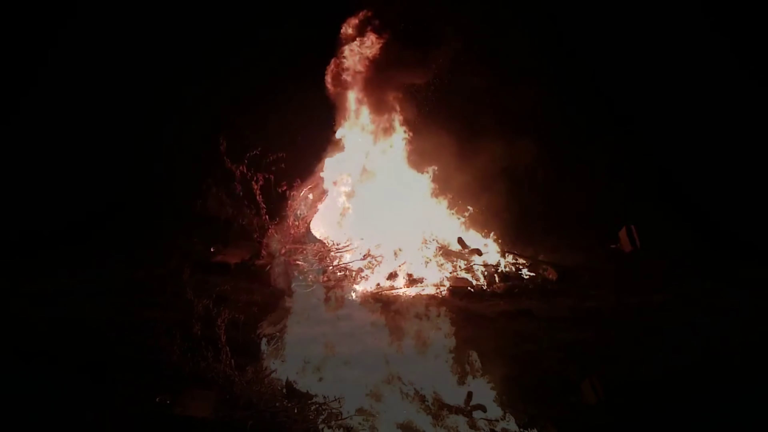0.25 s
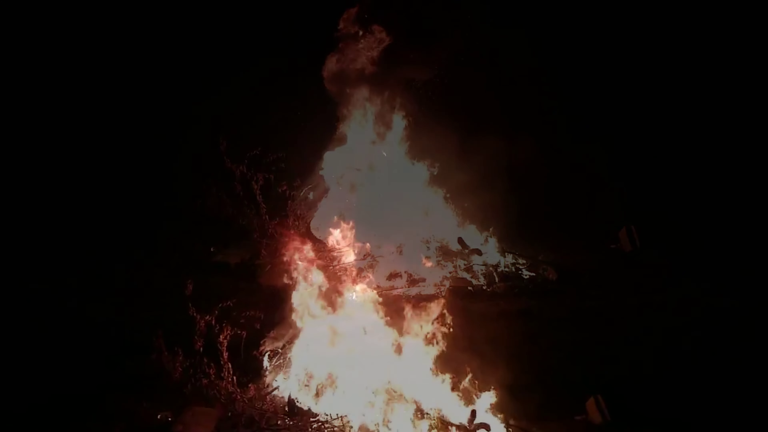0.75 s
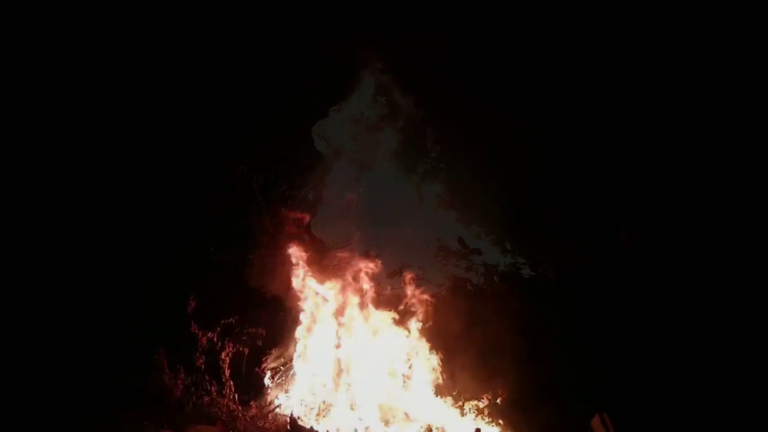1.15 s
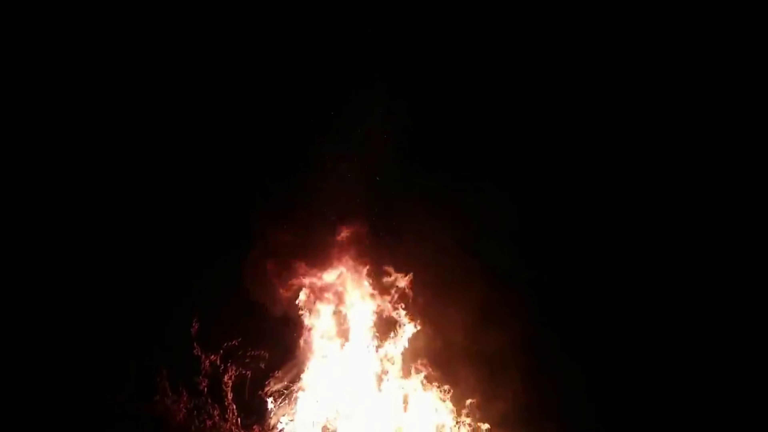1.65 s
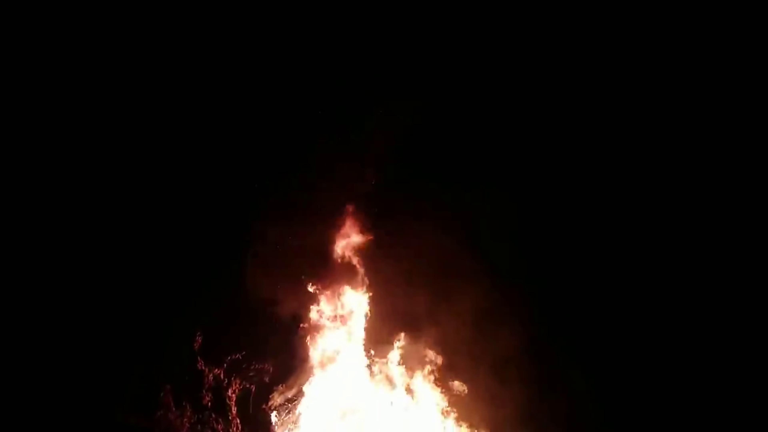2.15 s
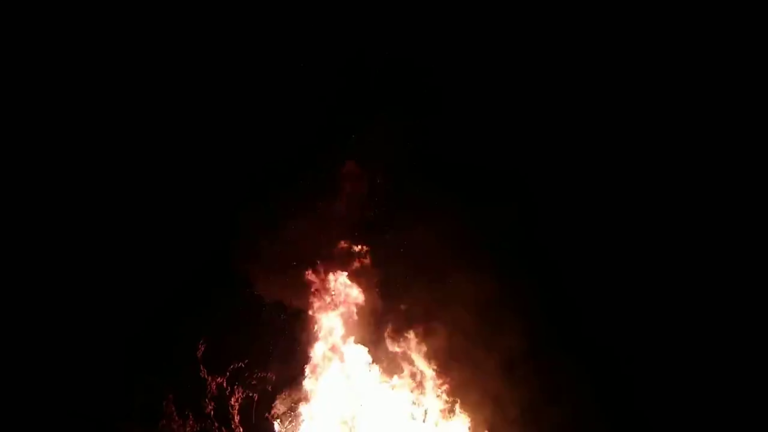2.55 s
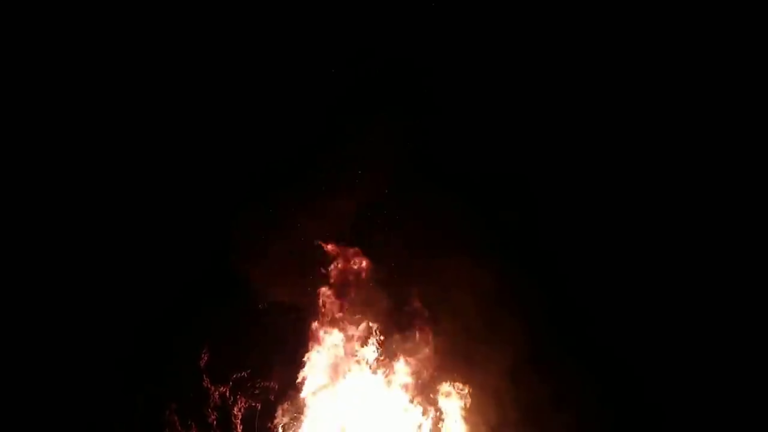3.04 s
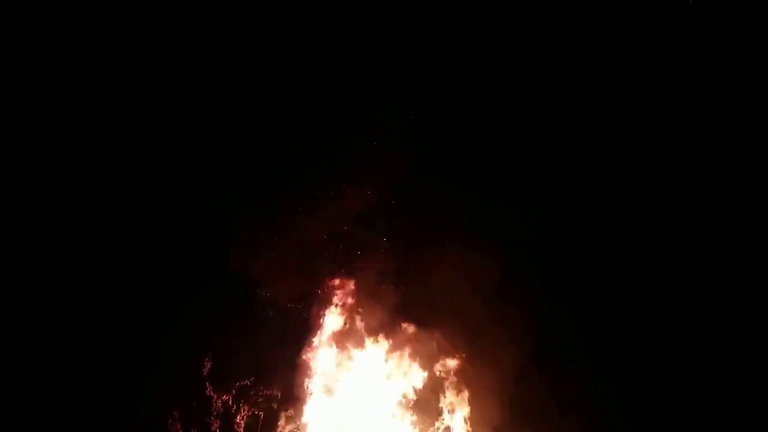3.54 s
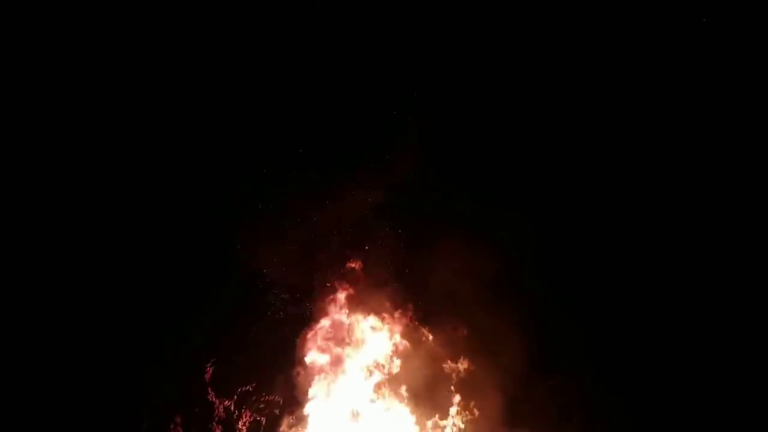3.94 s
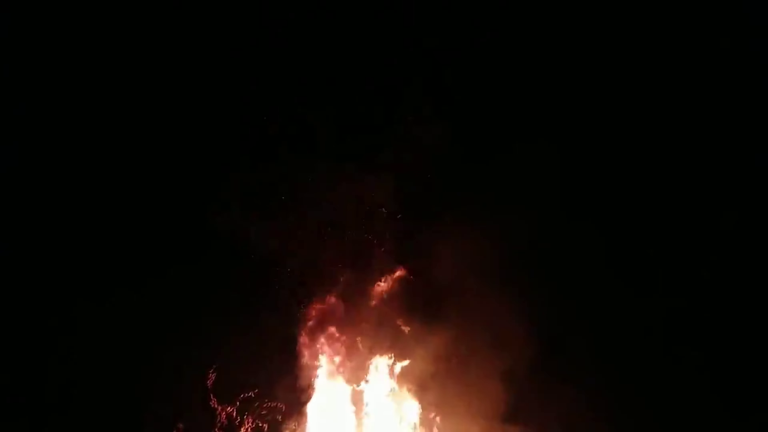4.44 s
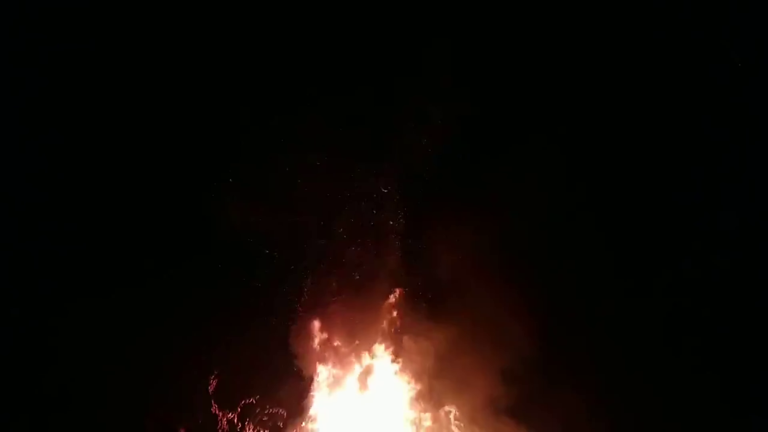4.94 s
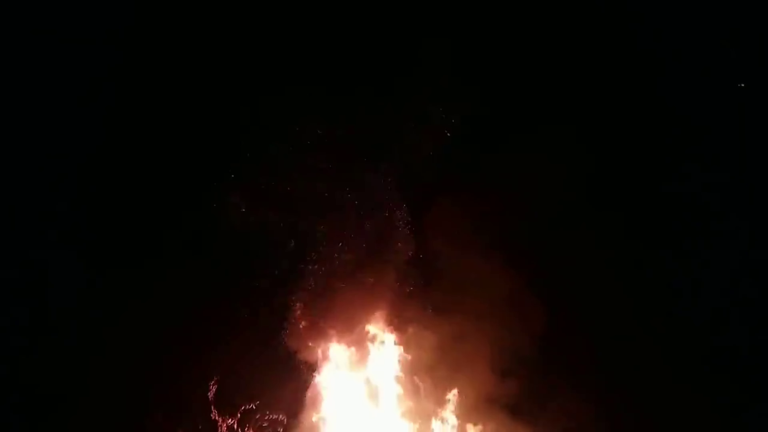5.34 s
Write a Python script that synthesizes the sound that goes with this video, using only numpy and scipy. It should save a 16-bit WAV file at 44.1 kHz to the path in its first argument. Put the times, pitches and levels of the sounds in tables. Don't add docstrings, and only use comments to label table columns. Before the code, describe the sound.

A large bonfire roars low and flutters in slow motion, wet wood hissing while sharp pops stutter in rapid little repeats.

```python
import sys
import numpy as np
from scipy import signal
from scipy.fft import rfft, irfft
from scipy.io import wavfile
from scipy.ndimage import uniform_filter1d

SR = 44100
rng = np.random.default_rng(int(sys.argv[2]) if len(sys.argv) > 2 else 0)


def volts_from_decibels(level):
    exponent = np.asarray(level, float) / 20
    return 10 ** exponent


def inscribe(sig):
    pcm = np.round(np.clip(np.atleast_2d(sig).T, -1, 1) * 32767)
    wavfile.write(sys.argv[1], SR, pcm.astype(np.int16))


N = 246519
FIRE_N = SR * 3 // 2


# start_s, knock_db, snap_db, spit_db
SAP_BURSTS = [(0.0773, -37, -48, -61), (0.1068, -24.5, -38, -40), (0.1283, -58, -39, -34),
              (0.174, -61, -38, -30), (0.1967, -26, -34, -45), (0.2083, -26.5, -27.5, -26),
              (0.321, -56, -39, -57), (0.3642, -42, -38, -49), (0.383, -45, -38.5, -46),
              (0.3941, -42, -42, -33.5), (0.6505, -35, -36, -46), (0.7466, -37, -41, -55),
              (0.768, -32.5, -38.5, -32.5), (0.7963, -37.5, -39, -45), (0.8331, -30.5, -25, -37.5),
              (0.8474, -50, -33, -32), (0.953, -56, -42, -31), (0.9716, -26, -22.5, -32.5),
              (1.027, -36.5, -52, -43), (1.0791, -31, -41, -49), (1.106, -37, -32.5, -25),
              (1.1165, -40, -24.5, -23.5), (1.1455, -12, -28, -36), (1.1594, -30, -45, -39),
              (1.209, -53, -56, -33), (1.219, -37, -40, -19), (1.227, -62, -44, -43),
              (1.253, -46, -52, -47), (1.266, -33, -26, -34), (1.2705, -48, -35, -40)]
# start_s, knock_db, snap_db, spit_db
SMALL_CRACKLES = [(0.0118, -35, -46, -30), (0.0174, -55, -49, -54), (0.041, -48, -62, -57),
                  (0.0645, -32, -53, -52), (0.0898, -35, -34, -49), (0.0994, -36, -47, -48),
                  (0.167, -41, -51, -56), (0.182, -57, -45, -39), (0.2137, -47, -40, -48),
                  (0.2196, -45, -52, -49), (0.236, -59, -55, -45), (0.2567, -64, -52, -43),
                  (0.2877, -58, -62, -41), (0.3108, -57, -47, -48), (0.3152, -45, -46, -49),
                  (0.3252, -39, -40, -48), (0.3614, -44, -54, -41), (0.4155, -41, -53, -55),
                  (0.4573, -52, -44, -38), (0.4707, -34.5, -46, -38), (0.495, -52, -47.5, -60),
                  (0.5316, -65, -53, -46.5), (0.5462, -50, -57.5, -65.5), (0.5835, -42, -51, -38),
                  (0.599, -36, -37.5, -36), (0.6335, -39, -40, -37), (0.739, -62, -51, -38),
                  (0.7754, -44, -53, -52), (0.8013, -52, -42, -46), (0.823, -62, -50, -56),
                  (0.906, -49, -43, -49), (0.9122, -52, -43.5, -48), (0.9284, -35, -57, -31),
                  (0.9418, -56, -49, -44), (0.9645, -43, -48, -32), (1, -44, -41, -35.5),
                  (1.061, -62, -49, -32.5), (1.089, -31.5, -44, -30.5), (1.174, -50, -55, -35),
                  (1.1967, -46, -52, -37), (1.2117, -65, -59, -57), (1.2566, -32, -37, -38),
                  (1.3035, -54, -48, -39), (1.3082, -44, -45, -52), (1.3248, -47, -37, -52),
                  (1.3316, -54, -55, -33), (1.3419, -60, -50, -51), (1.3469, -44, -42, -51),
                  (1.3613, -67.5, -50, -42), (1.3713, -62, -56, -37), (0.6168, -52, -40, -47)]
# freq_hz, gain_db
POP_TONE = [(450, 3), (750, -4), (1400, 9), (2300, 2), (3800, 4), (6500, 0), (8500, 3.5), (11000, 1),
            (15300, 0.5)]
POP_LAG_SAMPLES = 4


def pops():
    lead = SR * 3 // 1000
    t = (np.arange(SR // 50) - lead) / SR
    layers = np.zeros((3, 2, FIRE_N + len(t)))
    tail_gain = np.array([[.12], [.16], [.16]])
    tail = tail_gain * volts_from_decibels(-60 * np.abs(t) / np.where(t > 0, .02, .009))
    bounce_gain = -np.array([.42, .45, .35])[:, None, None]
    crack_gain, bounce_s = 10, 0.00203
    for start_s, *db in SAP_BURSTS + SMALL_CRACKLES + ticks():
        blur = np.clip(volts_from_decibels(-.9 * (max(db) + 27)), 1, 5)
        both, left, right = rng.standard_normal((3, len(t)))
        spray = np.array([both + 6.3 * left, both + 0.74 * right]) / 2.46
        crack = (t == 0) * crack_gain / blur ** 2
        spike = np.exp(-.5 * (t / blur / .00018) ** 2) * spray + crack
        bounce = bounce_gain * np.roll(spike[::-1], round(bounce_s * SR), axis=1)
        size = np.sqrt(np.sum(spike ** 2) / 2 / blur)
        burst = spike / size + bounce / size + 0.5 * tail[:, None] * spray
        at = round(start_s * SR)
        layers[:, :, at:at + len(t)] += volts_from_decibels(db)[:, None, None] * burst
    layers[:, 0] = np.roll(layers[:, 0], POP_LAG_SAMPLES, axis=1)

    hz = np.fft.rfftfreq(FIRE_N, 1 / SR)
    colour = ports(347, 22000, depth=1.0, tone=POP_TONE)
    total = np.linalg.norm(colour(hz))
    spectrum = 0
    for layer, edges_hz, trim_db in zip(layers, [(20, 2430), (4700, 10940), (9200, 41000)], [14.5, 15, 15]):
        split = band(hz, *edges_hz)
        share = volts_from_decibels(trim_db) * split * total / np.linalg.norm(colour(hz) * split)
        spectrum = spectrum + share * rfft(layer[:, lead:FIRE_N + lead])
    return coloured(irfft(spectrum, FIRE_N), colour)


# knock_db, snap_db, spit_db
TICK_DB = [-46, -47.5, -54.5]
TICK_COUNT, TICK_SCATTER_DB = 40, -6.5


def ticks():
    chance = rng.random((TICK_COUNT, 4))
    scatter = np.sqrt(12) * (chance[:, 1:] - .5)
    db = np.array(TICK_DB) + TICK_SCATTER_DB * scatter
    start_s = chance[:, 0] * 1.4
    return np.column_stack([start_s, db]).tolist()


# freq_hz, density_db_per_hz
ROAR = [(15, -43), (25, -13.5), (45, -4), (66, 2.5), (95, 0), (125, -5), (170, -33)]
# freq_hz, density_db_per_hz
FLUTTER = [(85, -36.5), (125, 0.5), (160, 1), (195, -6), (232, -1.5), (270, -9), (340, -9.5), (420, -17),
           (600, -38)]
# roar_db, flutter_db, steam_db, fizz_db
GUST_DB = [2.5, 2.2, 0.11, 2.1]


def flames():
    roar_db = flame_db(column=1, over_db=0.0, gust_db=GUST_DB[0])
    flutter_db = flame_db(column=2, over_db=0.5, gust_db=GUST_DB[1])
    return billow(ROAR, roar_db, left_db=-2.0) + billow(FLUTTER, flutter_db, left_db=-3.5)


def billow(spectrum, level_db, left_db):
    x = coloured(noise_pair(), lambda hz: volts_from_decibels(along(spectrum, hz)))
    power = uniform_filter1d(np.mean(x ** 2, 0), size=900)
    swell = np.abs(uniform_filter1d(power, size=900))
    evened_share = .75
    even = x / (swell + 1e-9) ** (evened_share / 2)
    return even * volts_from_decibels(level_db) * volts_from_decibels([[left_db / 2], [-left_db / 2]])


def wood():
    steam_db = flame_db(column=3, over_db=-0.5, gust_db=GUST_DB[2])
    fizz_db = flame_db(column=3, over_db=3, gust_db=GUST_DB[3])
    steam = seethe(410, 2390, steam_db, rate_per_s=210, spread_db=-8.0, life_s=0.11, smooth=20.0)
    fizz = seethe(2850, 16600, fizz_db, rate_per_s=210, spread_db=1.5, life_s=0.023, smooth=2.1)
    return steam + fizz + pops()


def seethe(lo_hz, hi_hz, level_db, rate_per_s, spread_db, life_s, smooth):
    chance = rng.random((2, FIRE_N))
    sizes = (chance[0] < rate_per_s / SR) * volts_from_decibels(-spread_db * np.log(chance[1] + .03))
    decay = volts_from_decibels(-120 * np.arange(600) / SR / life_s)
    bursts = np.convolve(sizes ** 2, decay)[:FIRE_N]
    power = smooth + bursts / np.mean(bursts)
    hiss = coloured(noise_pair() * np.sqrt(power), ports(lo_hz, hi_hz, depth=0.72))
    return volts_from_decibels(level_db) * unit(hiss)


# time_s, core_db, tongues_db, steam_db
BLAZE = [(0, -46, -51, -49.5), (.1, -47.5, -46.5, -44.5), (.2, -48, -50.5, -47.5),
         (.3, -46.5, -52.5, -49.5), (.4, -50.5, -52.5, -48.5), (.5, -48.5, -49, -49),
         (.6, -48.5, -49, -47.5), (.7, -49, -48, -47), (.8, -48.5, -50, -45), (.9, -50.5, -49, -46.5),
         (1.0, -42.5, -49, -46.5), (1.08, -48.5, -50.5, -46), (1.16, -49, -48, -46.5),
         (1.26, -52, -48.5, -47), (1.38, -60.5, -46, -48)]
GUSTS_PER_S = 38


def flame_db(column, over_db, gust_db):
    rows, t = np.array(BLAZE), np.arange(FIRE_N) / SR
    gusts = rng.standard_normal(2 * GUSTS_PER_S)
    gust = np.interp(t * GUSTS_PER_S, np.arange(len(gusts)), gusts)
    return np.interp(t, rows[:, 0], rows[:, column]) + over_db + gust_db * gust


# freq_hz, likeness_0_to_1
PORT_LIKENESS = [(60, 1), (250, .95), (600, 0.88), (1400, 0.36), (3000, 0.06)]


def noise_pair():
    a, b = rfft(rng.standard_normal((2, FIRE_N)))
    likeness = np.clip(along(PORT_LIKENESS, np.fft.rfftfreq(FIRE_N, 1 / SR)), 0, 1)
    turn = np.arccos(likeness) / 2
    return irfft([np.cos(turn) * a + np.sin(turn) * b, np.cos(turn) * a - np.sin(turn) * b], FIRE_N)


# freq_hz, density_db_per_hz
LEFT_PORT = [(450, -38.5), (700, -16.5), (1100, -29), (1700, -26.5), (2100, -18.5), (2500, -15.5),
             (2850, -28), (3600, -10.5), (5000, -15.5), (6800, -13), (8000, -29), (12000, -17),
             (15300, -20), (16500, -63)]
RIGHT_PORT = [(450, -16.5), (730, -9.5), (1100, -18), (1800, -12), (2000, 2.5), (2450, 1.5), (3000, -7),
              (3700, -6.5), (5000, -10.5), (5900, -3), (9000, -16.5), (11000, -6), (13300, -11.5),
              (14600, -7), (15300, -6), (16500, -38)]


def ports(lo_hz, hi_hz, depth, tone=((1, 0),)):
    def gain(hz):
        colour_db = np.array([along(LEFT_PORT, hz), along(RIGHT_PORT, hz)])
        return volts_from_decibels(depth * colour_db + along(tone, hz)) * band(hz, lo_hz, hi_hz)
    return gain


def along(points, hz):
    f, v = np.transpose(points)
    return np.interp(np.log(hz + 1), np.log(f + 1), v)


def unit(x):
    return x / np.sqrt(np.mean(x ** 2) + 1e-20)


def band(hz, lo_hz, hi_hz):
    return 1 / np.sqrt((1 + (lo_hz / (hz + 1)) ** 8) * (1 + (hz / hi_hz) ** 8))


def coloured(x, gain):
    g = np.atleast_2d(gain(np.fft.rfftfreq(4096, 1 / SR)))
    cepstrum = irfft(np.log(g + 1e-6))
    cepstrum[:, 1:2048] *= 2
    kernel = irfft(np.exp(rfft(cepstrum[:, :2048], 4096)))
    kernel = kernel / np.sqrt(np.mean(np.sum(kernel ** 2, 1)))
    return signal.fftconvolve(x, kernel, axes=1)[:, :x.shape[1]]


RESTARTS = [0.0, 0.0174, 0.0618, 0.09, 0.1247, 0.1504, 0.1903, 0.2087, 0.232, 0.2559, 0.2907, 0.3002, 0.332,
            0.341, 0.375, 0.3804, 0.4147, 0.4182, 0.4399, 0.4615, 0.4781, 0.4858, 0.5017, 0.5233, 0.5423,
            0.5532, 0.5739, 0.5893, 0.6066, 0.625, 0.6421, 0.6516, 0.6582, 0.6814, 0.6984, 0.7136, 0.7293,
            0.7363, 0.7494, 0.763, 0.7815, 0.8004, 0.8108, 0.8364, 0.8467, 0.8577, 0.882, 0.8913, 0.9089,
            0.9214, 0.9426, 0.9582, 0.9765, 0.9948, 1.0069, 1.0237, 1.039, 1.0641, 1.077, 1.0928, 1.1116,
            1.1324, 1.1579, 1.1701, 1.1998, 1.2127, 1.2318, 1.2558, 1.2809, 1.3031, 1.3301]
FIRST_SPLICE_S, PIECE_S = .05687, .079482
BLEND_S, BLEND_LEAD_S = .009, .003


def lags():
    starts_s = np.append(0, np.arange(FIRST_SPLICE_S, N / SR, PIECE_S))
    behind_s = starts_s - np.ravel(RESTARTS)
    splices = np.round((starts_s[1:] - BLEND_LEAD_S) * SR).astype(int)
    return splices, np.round(behind_s * SR).astype(int)


def slowed(x, splices, lag, size):
    n, blend, behind = np.arange(N), round(BLEND_S * SR), lag.copy()
    for k, at in enumerate(splices):
        ending = x[1, at - behind[k]:][:blend]
        start = at - behind[k + 1] - size
        match = np.correlate(x[1, start:start + 2 * size + blend], ending)
        behind[k + 1] += size - np.argmax(match)
    piece = np.searchsorted(splices, n, "right")
    mix = np.clip((n - np.append(-SR, splices)[piece]) / blend, 0, 1)
    new = x[:, n - behind[piece]]
    old = x[:, n - behind[np.maximum(piece - 1, 0)]]
    return mix * new + (1 - mix) * old


# time_s, gain_db
FADER = [(0, -12.5), (.1, -14.5), (.45, -9), (.9, -4), (2, -2.5), (4.4, -3), (5.6, -5.5)]
LEFT_LAG_SAMPLES = 6


def scene():
    time_s, gain_db = np.transpose(FADER)
    cuts = lags()
    fire = slowed(flames(), *cuts, size=170) + slowed(wood(), *cuts, size=0)
    left, right = fire * volts_from_decibels(np.interp(np.arange(N) / SR, time_s, gain_db))
    return np.array([np.roll(left, LEFT_LAG_SAMPLES), right])


def low_pass(x):
    return signal.sosfilt(signal.butter(12, 16660, fs=SR, output="sos"), x)


def record(dry):
    top_hz, click_top_hz, click_over_db = 15750, 16900, 15
    hz, whole = np.fft.rfftfreq(N, 1 / SR), rfft(dry)
    kept = irfft(whole * (hz < top_hz), N)
    top = irfft(whole * (hz >= top_hz) * (hz < click_top_hz), N)
    power = np.sum(top ** 2, 0)
    now, around = uniform_filter1d(power, 128), uniform_filter1d(power, 8192)
    gate = uniform_filter1d(1. * (now > around * volts_from_decibels(click_over_db)), size=128)
    return low_pass(kept + gate * top)


dry = scene()
out = record(dry)
inscribe(out)
```